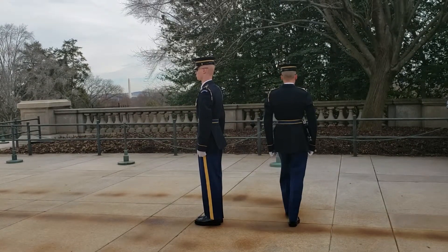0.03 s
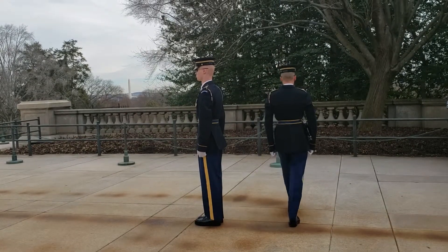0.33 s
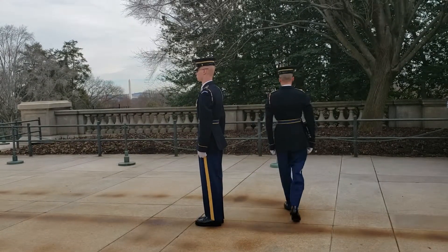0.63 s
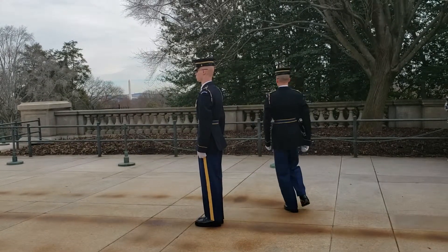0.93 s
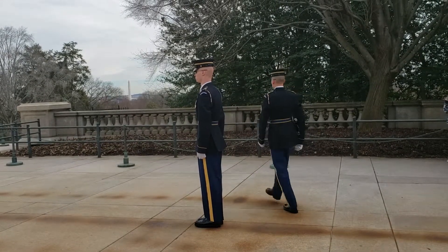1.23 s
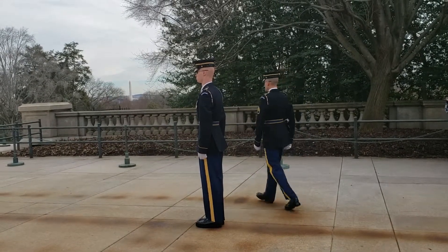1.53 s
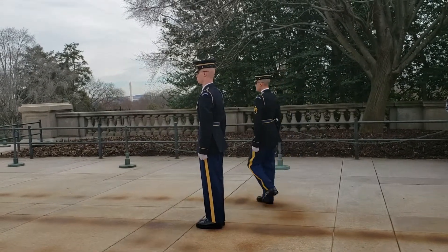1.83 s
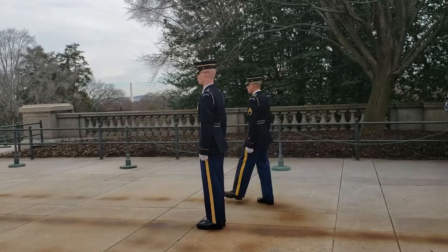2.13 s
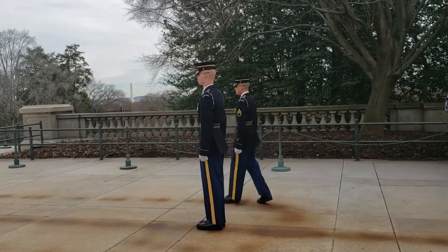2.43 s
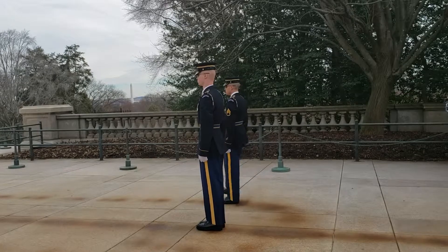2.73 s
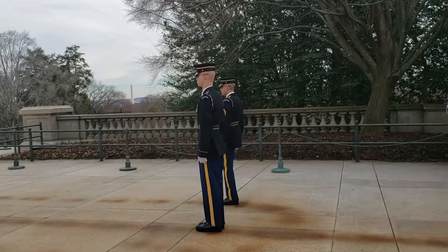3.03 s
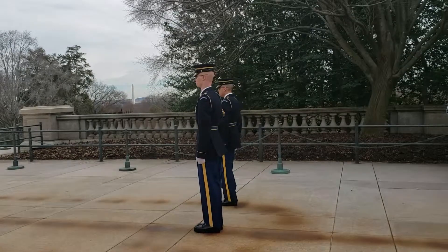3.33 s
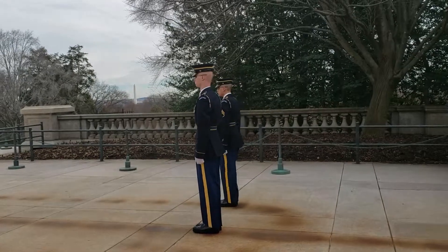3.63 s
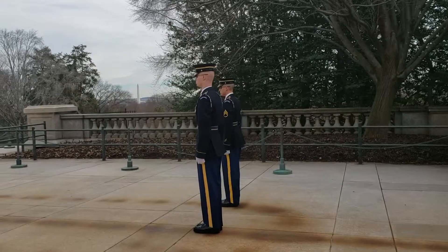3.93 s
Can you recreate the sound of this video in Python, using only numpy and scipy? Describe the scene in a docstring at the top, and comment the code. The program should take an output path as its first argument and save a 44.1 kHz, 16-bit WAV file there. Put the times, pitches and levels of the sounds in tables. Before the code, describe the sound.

Slow footsteps in steel-plated shoes cross a stone plaza a few metres away. A brief scrape leads into five clacking steps with light metallic pings, then the heels clap together loudly. Distant traffic rumbles faintly throughout.

```python
"""A stone plaza, stereo microphone, distant traffic rumbling throughout. A few metres away a steel-plated
shoe scrapes, then five slow, deliberate steps follow: each knocks the sole, clacks the steel and cracks
grit, and the stone walls scatter the sound. Between steps the plates slide, or ring freely as a foot lifts.
From midway a faint, far hiss comes and goes twice. At the end the heels clap together and rebound."""
import sys
import numpy as np
from scipy import signal
from scipy.fft import rfft, irfft
from scipy.io import wavfile

SR = 44100
rng = np.random.default_rng(int(sys.argv[2]) if len(sys.argv) > 2 else 0)


def int16_out(signal):
    """Quantize to a 16-bit WAV file."""
    q = np.round(np.clip(np.atleast_2d(signal).T, -1, 1) * 32767)
    wavfile.write(sys.argv[1], SR, q.astype(np.int16))


N = 176400
T = np.arange(N) / SR
RING_N = SR // 2  # samples given to each shoe sound
RING_T = T[:RING_N]
APART_HZ = 7700  # above this the two channels differ widely

# spectrum of steel sliding on stone: f/Hz, level/dB
RASP_SPECTRUM = [(200, -14), (800, -1), (1200, -3), (1700, -15), (2350, 0), (2650, -6), (3150, 4),
                 (3600, -1), (4100, 2), (5300, -7), (6200, -4), (8500, -17), (16000, -26)]
# spectrum of crushed grit: f/Hz, level/dB
GRIT_SPECTRUM = [(500, -22.5), (3000, -12.5), (4800, -7), (6200, -6), (8200, -6), (10300, -8), (12800, -6),
                 (15500, -8)]


def undb(db):
    """Decibels to gain."""
    return 10 ** (np.asarray(db) / 20)


def unit(x):
    """Scale to rms 1."""
    return x / np.sqrt(np.mean(x ** 2))


def fade(t, t60):
    """Exponential decay, 60 dB in t60 seconds."""
    return np.exp(-np.log(1000) * t / t60)


def waver(t, per_s):
    """Random values, per_s of them a second, joined by straight lines."""
    return np.interp(t * per_s, np.arange(len(t)), rng.standard_normal(len(t)))


def by_freq(points, size):
    """Read a (f/Hz, value) table at every bin of a spectrum."""
    hz, value = np.array(points).T
    return np.interp(np.log(np.fft.rfftfreq(size, 1 / SR) + 1), np.log(hz), value)


def colour(x, points):
    """Filter by a (f/Hz, level/dB) table."""
    return irfft(rfft(x) * undb(by_freq(points, x.shape[-1])), x.shape[-1])


def favour(table, focus_hz, db_per_octave):
    """Weaken modes or spectrum points the further they lie from a favoured frequency."""
    return [(hz, db - db_per_octave * abs(np.log2(hz / focus_hz)), *rest) for hz, db, *rest in table]


def stereo(mid, side, width):
    """Left and right from mid and side; width is the side's gain at each frequency bin."""
    side = irfft(rfft(side) * width, len(side))
    return np.array([mid + side, mid - side])


def hiss(points, size, grains=1):
    """Stereo noise of a given spectrum, wider towards the treble."""
    mid, side = colour(rng.standard_normal((2, size)) * grains, points)
    width = np.minimum(np.sqrt(np.fft.rfftfreq(size, 1 / SR) / APART_HZ), 1)
    return unit(stereo(mid, side, width))


def ring(modes, scatter=.004):
    """Struck modes, slightly detuned each time; the high ones reach the two channels out of step."""
    out = 0
    for k, (hz, db, t60) in enumerate(modes):
        detune, apart = rng.standard_normal(2)
        shift = np.sign(apart) * min(hz / APART_HZ, .85) * np.array([[1], [-1]])
        phase = 2 * np.pi * hz * (1 + scatter * detune) * RING_T + shift
        out = out + (-1) ** k * undb(db) * fade(RING_T, t60) * np.sin(phase)
    return out


def blow(x, db, within_s=.008):
    """Scale a short sound to the level it would have if all its energy fell in within_s."""
    return x * undb(db) * np.sqrt(within_s * SR / np.sum(x ** 2, axis=-1, keepdims=True))


def add(out, start, x, pan_db):
    """Mix a stereo sound in at its time and place; pan_db is left over right."""
    i = max(int(start * SR), 0)
    out[:, i:i + x.shape[1]] += x[:, :N - i] * undb(np.array([[pan_db], [-pan_db]]) / 2)


def traffic(drone_hz=64.7, half_width_hz=6.1, drone_db=-47):
    """Traffic far from the plaza: low noise with a wavering engine drone."""
    # rumble spectrum: f/Hz, level/dB
    spectrum = [(18, -44.5), (38, -11), (56, 1), (95, -4), (160, -11.5), (250, -17), (400, -27.5),
                (900, -37), (1600, -46), (3200, -55), (5000, -55.5), (8000, -57.5), (16000, -62.5)]
    # rise of the rumble: t/s, level/dB
    levels = [(0,-47.5), (1.4,-41), (4,-40.5)]
    # stereo width: f/Hz, side/mid ratio
    width = [(40, 0.38), (140, 0.099), (600, 0.36), (2000, 1), (12000, 0.75)]
    mid, side = colour(rng.standard_normal((2, N)), spectrum)
    rumble = unit(stereo(mid, side, by_freq(width, N)))
    resonance = 1 / (1 + ((np.fft.rfftfreq(N, 1 / SR) - drone_hz) / half_width_hz) ** 2)
    drone = unit(irfft(rfft(rng.standard_normal(N)) * resonance, N))
    swell = undb(np.interp(T, *np.array(levels).T))
    return swell * rumble + undb(drone_db) * unit(swell) * drone


def far_hiss(flicker_db=4):
    """Faint, narrow bands of hiss swell, flicker and fade in the distance."""
    # noise bands: t/s, length/s, f/Hz, bandwidth/Hz, level/dB
    bands = [(1.6,1,2170,260,-66.5), (2.9,0.58,2150,303,-66.5)]
    out, bins = np.zeros((2, N)), np.fft.rfftfreq(N, 1 / SR)
    for start, length, hz, width_hz, db in bands:
        peak = (1 + (2 * (bins - hz) / width_hz) ** 2) ** -1.2
        band = unit(irfft(rfft(rng.standard_normal((2, N))) * peak, N))
        swell = np.sin(np.pi * np.clip((T - start) / length, 0, 1))
        out += band * undb(db - flicker_db * waver(T, per_s=10)) * swell
    return out


def plaza(x, early_db=-3.5, late_db=-19, late_delay_s=0.021, late_build_s=0.036):
    """Quick scatter from nearby stone, then a longer wash from the walls that dulls as it dies."""
    # decay of the wash: f/Hz, t60/s
    decays = [(150, 0.29), (800, 0.91), (3000, 0.57), (8000, 0.54), (16000, 0.35)]
    # stereo width of the reflections: f/Hz, side/mid ratio
    width = [(150, 0.34), (600, 0.52), (1500, 1), (8000, 1)]
    t = T[:SR]
    mid, side = rng.standard_normal((2, SR))
    noise = stereo(mid, side, by_freq(width, SR))
    early = noise * fade(t, t60=0.2) * np.minimum(t / 0.0014, 1)
    late = np.zeros((2, SR))
    for hz, t60 in decays:
        band = by_freq([(f, f == hz) for f, _ in decays], SR)
        late += irfft(rfft(noise) * band, SR) * fade(t, t60)
    late *= np.clip((t - late_delay_s) / late_build_s, 0, 1)
    response = (undb(early_db) * unit(early) + undb(late_db) * unit(late)) / np.sqrt(SR)
    return signal.fftconvolve(x, response, axes=1)[:, :N]


def scrapes(grains_per_s=7000, grain_spread_db=3.3, judder_db=1.8, ring_swell_db=8):
    """Steel catches on many grains of stone; they set the plate ringing, the more so as the foot unloads."""
    # slides: t/s, length/s, level/dB, swell/dB, grit over rasp/dB, final ring over rasp/dB,
    # ease in and out/s, pitch ratio, rasp tilt/(dB per octave), pan/dB
    slides = [(0,0.14,-46,-3,-9.5,-14,0.0024,1.05,-1.5,1),
              (0.091,0.055,-44.5,-0.5,-17,1.5,0.0082,1.026,5.5,-1),
              (1.046,0.1,-40,-10,-3,-9.5,0.0036,1.05,2,-2), (2.009,0.091,-37.5,-2.5,-9,-15,0.0024,0.86,0,0)]
    # modes of a sliding plate: f/Hz, level/dB, t60/s
    plate_modes = [(3100,0,.028), (3920,-1,.028)]
    out, t = np.zeros((2, N)), RING_T
    for start, length, db, swell_db, grit_db, ring_db, ease_s, pitch, tilt_db, pan_db in slides:
        catches = rng.random(RING_N) < grains_per_s / SR
        grains = catches * undb(grain_spread_db * np.minimum(rng.exponential(size=RING_N), 4))
        progress = np.minimum(t / length, 1)
        plate = ring([(hz * pitch, level, t60) for hz, level, t60 in plate_modes])
        kicks = grains * rng.standard_normal(RING_N)
        plate = unit(signal.fftconvolve(plate, kicks[None])[:, :RING_N])
        plate *= undb(ring_db + ring_swell_db * (progress - 1))
        force = undb(db + swell_db * progress + judder_db * waver(t, per_s=170))
        envelope = (1 - np.exp(-t / ease_s)) * np.exp(-np.maximum(t - length, 0) / ease_s)
        tilted = [(hz * pitch, level + tilt_db * np.log2(hz)) for hz, level in RASP_SPECTRUM]
        rasp = hiss(tilted, RING_N, grains)
        grit = undb(grit_db) * hiss(GRIT_SPECTRUM, RING_N, grains)
        add(out, start, force * envelope * (rasp + grit + plate), pan_db)
    return out


def pings(rise_s=0.00072, damp_db=4.5, damp_s=0.0022, graze_lead_s=.004, graze_db=-15):
    """An unloaded plate grazes the stone, then ticks; its ring drops at once and carries on thinly."""
    # flicks of a plate: t/s, low modes/dB, top modes/dB, tick/dB, favoured low mode/Hz, pan/dB
    flicks = [(0.8106,-50,-28.5,-43,5230,-2), (.861,-54,-39.5,-47,7000,-2),
              (1.5375,-39,-40.5,-42,7650,-0.5), (1.7292,-38.5,-29,-37.5,7700,-1),
              (2.632,-44.5,-31.5,-41.5,5100,3), (2.6921,-58,-49,-51,5250,-2)]
    # lower modes of a free plate: f/Hz, level/dB, t60/s
    low_modes = [(4118, -9, .04), (5216, -3, .04), (7720, 0, .05), (9830, -7, .04)]
    # its top cluster of modes: f/Hz, level/dB, t60/s
    top_modes = [(11900, -10, .016), (12290, 0, .028), (12400, -12, .05), (12620, -7, .016)]
    out = np.zeros((2, N))
    rise = 1 - np.exp(-RING_T / rise_s)
    damping = 1 + undb(damp_db) * np.exp(-RING_T / damp_s)
    for start, low_db, top_db, tick_db, focus_hz, pan_db in flicks:
        tick = hiss(GRIT_SPECTRUM, RING_N) + 0.081 * hiss(RASP_SPECTRUM, RING_N)
        tick *= fade(RING_T, t60=0.026)
        low = ring(favour(low_modes, focus_hz, db_per_octave=9.5)) * damping
        top = ring(top_modes) * damping
        ping = blow(low, low_db) + blow(top, top_db) + blow(tick, tick_db)
        add(out, start, ping * rise, pan_db)
        add(out, start - graze_lead_s, blow(tick, tick_db + graze_db), pan_db)
    return out


def strikes(roughness=0.048, bite_s=.0004):
    """A few metres off, the sole knocks, the steel clacks through a rough contact and grit cracks."""
    # shoe on stone or on shoe: t/s, knock/dB, clack/dB, crack/dB, steel frequency that the point of
    # contact favours/Hz, how strongly/(dB per octave), favoured crack frequency/Hz, pan/dB
    contacts = [(0.5715,-39,-55,-52.5,4500,7,7450,-4), (1.042,-36,-32.5,-24.5,3050,22,8430,-3.5),
                (1.518,-36,-45,-51.5,3500,2,8000,-2.5), (2.006,-36,-23,-26,4700,8,15300,-1),
                (2.483,-32.5,-44.5,-38,4500,5.5,5960,-2.5), (3.5527,-19,-22,-20,4250,16,7580,-5),
                (3.572,-39,-38.5,-30,4800,10.5,12000,5), (3.6121,-43,-30,-25,3950,39.5,10000,3.5)]
    # modes of the sole: f/Hz, level/dB, t60/s
    sole_modes = [(239, -1, 0.024), (504, -3, 0.022), (823, 8.5, 0.0067), (1070, 4.5, 0.0096),
                  (1340, 2, 0.0015)]
    # modes of a plate pressed on stone: f/Hz, level/dB, t60/s
    plate_modes = [(2250, -10, .008), (3080, 0, .011), (3720, -4, .011), (4450, -3, .008), (5100, -3, .007),
                   (6200, -1, .008), (7400, -6, .006)]
    out = np.zeros((2, N))
    bite = 1 - np.exp(-RING_T / bite_s)
    for start, knock_db, clack_db, crack_db, focus_hz, focus_db, crack_hz, pan_db in contacts:
        force = roughness * rng.standard_normal(RING_N) * fade(RING_T, t60=0.0026)
        force[0] += 1  # the impact itself
        plate = ring(favour(plate_modes, focus_hz, focus_db))
        clack = signal.fftconvolve(plate, force[None])[:, :RING_N]
        grit = hiss(favour(GRIT_SPECTRUM, crack_hz, db_per_octave=7), RING_N)
        crack = grit * fade(RING_T, t60=0.005)
        add(out, start, blow(bite * clack, clack_db) + blow(bite * crack, crack_db), pan_db)
        add(out, start, blow(ring(sole_modes), knock_db), 0)
    return out


def heel_claps(slap_db=-9.5):
    """Straight ahead of the microphone the heels meet and rebound, ringing under a slap of leather."""
    # clap and rebound: t/s, level/dB
    claps = [(3.5540, -15.5), (3.614, -31.5)]
    # modes of the two heels together: f/Hz, level/dB, t60/s
    heel_modes = [(155, -9, .09), (240, -9, .07), (332, -12, .18), (435, -14, .05), (505, -10, .08),
                  (600, -11, .07), (655, -10, .07), (822, -1, .045), (835, -21, .3), (1120, -5, .028),
                  (1300, -4, .022), (1650, -11, .03), (2050, -4, .022)]
    # spectrum of leather on leather: f/Hz, level/dB
    leather = [(300, -8), (900, 9), (1300, -4), (1750, -5), (2100, -2), (2700, -6), (4000, -20.5),
               (16000, -36)]
    out = np.zeros((2, N))
    for start, db in claps:
        slap = hiss(leather, RING_N) * fade(RING_T, t60=0.027)
        add(out, start, blow(ring(heel_modes), db) + blow(slap, db + slap_db), 0)
    return out


def scene(ping_send_db=-10.5, scrape_send_db=-12.5):
    """At the microphone: the shoes direct, their echo off the stone, and the distance behind."""
    steps = strikes() + heel_claps()
    ringing, sliding = pings(), scrapes()
    echo = plaza(steps + undb(ping_send_db) * ringing + undb(scrape_send_db) * sliding)
    return traffic() + far_hiss() + echo + sliding + ringing + steps


def record(dry, top_hz=16300):
    """The recorder rounds the highest peak and cuts the top treble."""
    lowpass = signal.ellip(10, .2, 80, top_hz, fs=SR, output="sos")
    return signal.sosfilt(lowpass, np.tanh(dry))


dry = scene()
out = record(dry)
int16_out(out)
```